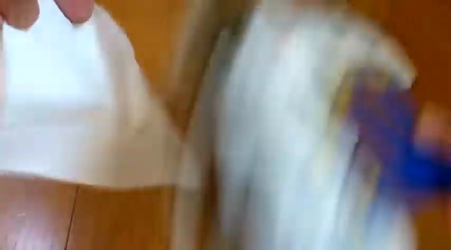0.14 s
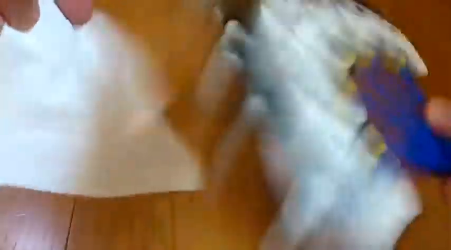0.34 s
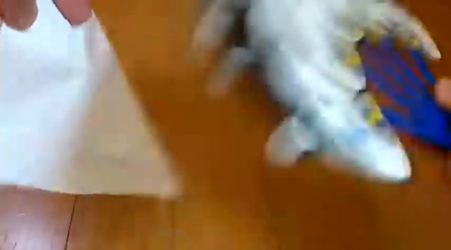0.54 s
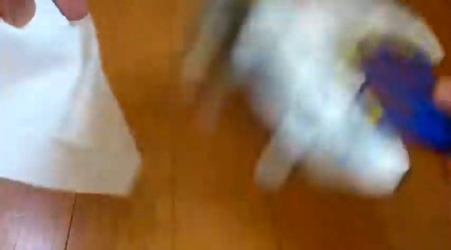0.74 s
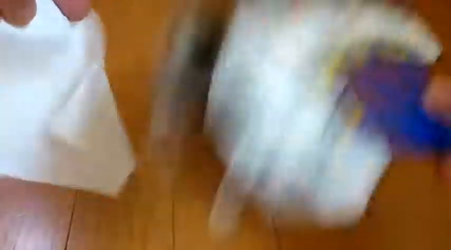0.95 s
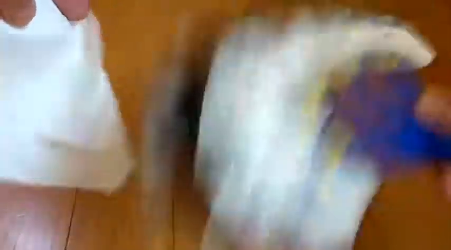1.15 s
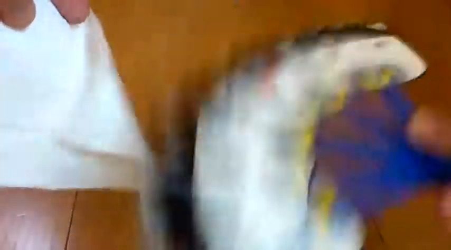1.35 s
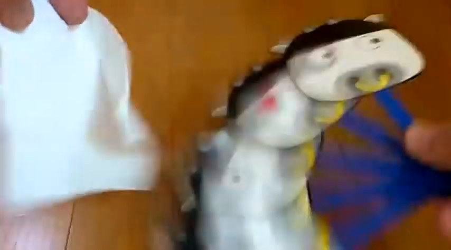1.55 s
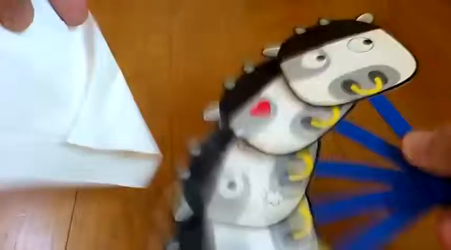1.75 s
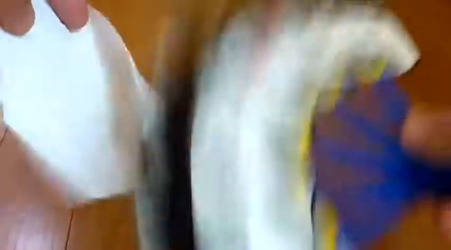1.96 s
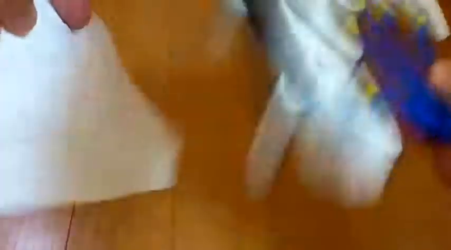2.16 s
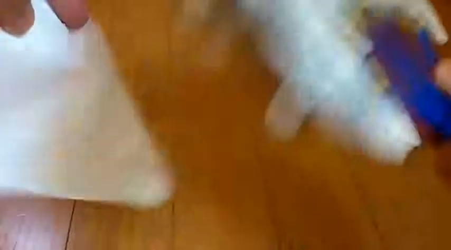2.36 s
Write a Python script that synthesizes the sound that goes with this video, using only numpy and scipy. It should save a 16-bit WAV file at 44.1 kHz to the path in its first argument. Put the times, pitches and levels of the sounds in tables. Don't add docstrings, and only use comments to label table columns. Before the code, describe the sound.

Folding fan snaps loudly once, then rustles and ticks as it is waved in a quiet room

```python
import sys
import numpy as np
from scipy import signal
from scipy.fft import rfft, irfft
from scipy.io import wavfile

SR = 44100
rng = np.random.default_rng(int(sys.argv[2]) if len(sys.argv) > 2 else 0)


def transcribe(signal):
    frames = np.atleast_2d(signal).T
    limited = np.clip(frames, -1, 1)
    pcm = np.round(limited * 32767).astype(np.int16)
    wavfile.write(sys.argv[1], SR, pcm)


def gain_from_db(level_db):
    decades = np.asarray(level_db, float) / 20
    return 10 ** decades


N = 105840


def rms_one(x):
    return x / np.sqrt(np.mean(x ** 2) + 1e-20)


def drift(rate_hz):
    r = np.exp(-2 * np.pi * rate_hz / SR)
    wander = signal.lfilter([1], [1, -2 * r, r * r], rng.standard_normal(N + SR))
    return rms_one(wander[SR:])


def ring(x, hz, t60_s):
    r = gain_from_db(-60 / (t60_s * SR))
    w = 2 * np.pi * hz / SR
    return signal.lfilter([0, np.sin(w)], [1, -2 * r * np.cos(w), r * r], x + 1e-18)


def peak(x, hz, width_hz):
    r = np.exp(-np.pi * width_hz / SR)
    poles = [1, -2 * r * np.cos(2 * np.pi * hz / SR), r * r]
    return signal.lfilter([(1 - r * r) / 2, 0, (r * r - 1) / 2], poles, x + 1e-18)


def at_hz(points, hz):
    table_hz, values = np.transpose(points)
    return np.interp(np.log(hz), np.log(table_hz), values)


# pitch_hz, density_db (per Hz)
ROOM_TONE = [(12, -34), (20, 5), (120, -8), (310, -16), (659, -13.5), (2190, -20.5), (3430, -20),
             (8390, -25.5), (16000, -38.5)]
# pitch_hz, alike_share
LIKENESS = [(60, 0.73), (180, 0.66), (550, 0.47), (1650, 0.1), (4970, -3.8), (15000, -4)]
ROOM_TONE_DB, RUMBLE_RISE_DB, PAN_DB = -56.5, 5.5, 0.9
HUM_HZ, HUM_WIDTH_HZ, HUM_WAVERING_DB, HUM_STEADY_DB = 119, 9.0, -65, -64.5
MOTOR_HZ, MOTOR_WIDTH_HZ, MOTOR_DB = 52.7, 5.1, -67.5


def room_tone():
    white = rng.standard_normal((2, 2, N + SR))
    edges = 20 * 2 ** np.arange(0, 10.1, .5)
    tone = 0
    for k, (low, high) in enumerate(zip(edges, edges[1:])):
        band = signal.butter(2, [low, high], "band", fs=SR, output="sos")
        mid, side = signal.sosfilt(band, white[k % 2])[:, SR:]
        centre_hz = np.sqrt(low * high)
        alike = np.clip(at_hz(LIKENESS, centre_hz), 0, 1)
        swell_db = (50 < low < 300) * RUMBLE_RISE_DB * np.arange(N) / N
        stereo = np.sqrt(1 + alike) * mid + np.sqrt(1 - alike) * side * [[1], [-1]]
        tone = tone + gain_from_db(at_hz(ROOM_TONE, centre_hz) + swell_db) * stereo
    motor = rms_one(peak(white[0, 1], MOTOR_HZ, MOTOR_WIDTH_HZ)[SR:])
    wavering = peak(rng.standard_normal(N + SR), HUM_HZ, HUM_WIDTH_HZ)
    wavering = rms_one(peak(wavering, HUM_HZ, 2 * HUM_WIDTH_HZ)[SR:])
    steady = np.sqrt(2) * np.sin(2 * np.pi * HUM_HZ * np.arange(N) / SR)
    hum = gain_from_db(HUM_WAVERING_DB) * wavering + gain_from_db(HUM_STEADY_DB) * steady
    background = gain_from_db(ROOM_TONE_DB) * rms_one(tone) + gain_from_db(MOTOR_DB) * motor + hum
    return background * gain_from_db(PAN_DB * np.array([[1], [-1]]))


# time_s, level_db
EFFORT = [
    (0.0, -66.5),
    (0.17, -73),
    (0.29, -70),
    (0.91, -68),
    (1.48, -67),
    (1.86, -64.5),
    (2.4, -61),
]
GRAINS_PER_S, GRAIN_SPREAD_DB, GRAIN_CYCLES = 3000, 3.0, 3.8
RUSTLE_DB, CLUMP_DB, CLUMP_HZ = -3.0, 2.5, 40.0
SETTLE_S, SETTLE_DB = 0.014, -28.5


def leaf_rustle(ticks):
    effort_db = np.interp(np.arange(N) / SR, *np.transpose(EFFORT))
    jolts = np.zeros(N)
    jolts[[int(row[0] * SR) for row in ticks]] = gain_from_db(np.array([row[1] + SETTLE_DB for row in ticks]))
    settling = signal.lfilter([1], [1, -np.exp(-1 / (SETTLE_S * SR))], jolts)
    sizes = gain_from_db(GRAIN_SPREAD_DB * np.minimum(rng.exponential(1, N), 3)) * rng.choice([-1, 1], N)
    clicks = sizes * (rng.random(N) < GRAINS_PER_S / SR)
    pitches_hz = np.geomspace(1500, 11000, num=14)
    dealt = rng.integers(0, 14, size=N)
    grains = 0
    for k, hz in enumerate(pitches_hz):
        grains = grains + ring(clicks * (dealt == k), hz, GRAIN_CYCLES / hz) * (hz / 3000) ** 0.39
    return (gain_from_db(effort_db + RUSTLE_DB) + settling) * gain_from_db(CLUMP_DB * drift(CLUMP_HZ)) * rms_one(grains)


# pitch_hz, level_db, t60_s
BODY = [(347, -8, 0.012), (470, -10, 0.032), (652.3, -7.5, 0.1), (729, -10, 0.07), (875, -16, 0.064),
        (1014, -9.5, 0.022), (1330, -7.5, 0.02), (1526, -15.5, 0.042), (1845, -16.5, 0.084),
        (2300, -13.5, 0.033), (3350, -15.5, 0.072)]
CONTACT_SWELL, CRACK = 0.79, 3.38
CONTACT_APART = .45
CONTACT_CUT_HZ, CONTACT_TOP_HZ, CONTACT_OVER_DB = 1960, 10870, -9.5
BRIGHT_Q, KNOCK_SPREAD_DB = 4.5, 4.6


def contacts(rows, gain_db, knock_gain_db, bright_db):
    t = np.arange(1024) / SR
    out = np.zeros((2, N + SR))
    knocks = np.zeros((len(BODY), N + SR))
    low_cut = signal.butter(3, CONTACT_CUT_HZ, "high", fs=SR, output="sos")
    top_cut = signal.butter(4, CONTACT_TOP_HZ, fs=SR, output="sos")
    for start_s, peak_db, brightest_hz, contact_ms, knock_db in rows:
        grit, other = rng.standard_normal((2, len(t))) * gain_from_db(4.1 * rng.standard_normal(len(t)))
        grit = grit + CONTACT_APART * other * np.array([[1], [-1]])
        phase = t * 2000 / max(contact_ms, .3)
        burst = grit * phase ** CONTACT_SWELL * np.exp(-phase)
        burst[:, 6] += CRACK * np.sign(grit[0, 0])
        bright = peak(burst, brightest_hz, brightest_hz / BRIGHT_Q)
        burst = signal.sosfilt(low_cut, burst + gain_from_db(bright_db) * bright)
        knock_db = knock_db + knock_gain_db
        burst = signal.sosfilt(top_cut, burst) + gain_from_db(CONTACT_OVER_DB - (knock_db + 26.5)) * burst
        i = int(start_s * SR)
        out[:, i:i + len(t)] += gain_from_db(peak_db + gain_db) * burst / np.abs(burst).max()
        uneven_db = KNOCK_SPREAD_DB * rng.standard_normal(len(BODY))
        knocks[:, i] += gain_from_db(peak_db + knock_db + uneven_db) * rng.choice([-1, 1], len(BODY))
    for knock, (hz, level_db, t60_s) in zip(knocks, BODY):
        out += gain_from_db(level_db - 3.5) * ring(knock, hz, t60_s)
    return out[:, :N]


# start_s, peak_db, brightest_hz, contact_ms, knock_db
TICKS_EARLY = [(0.1082, -33.5, 2500, 2.7, -20), (0.1144, -35, 3350, 3.1, -17),
               (0.1386, -31, 7100, 1.8, -20.5), (0.196, -34.5, 3500, 4.6, -18),
               (0.2074, -43, 7580, 2.2, -19), (0.3288, -29, 8450, 2.2, -47),
               (0.3386, -27.5, 2840, 1.9, -19.5), (0.3390, -31.5, 9000, 1.7, -45.5),
               (0.3504, -33.5, 5500, 6.6, -34), (0.3564, -36, 5800, 1.7, -18.5),
               (0.3624, -37, 7400, 1, -27), (0.4155, -40.5, 3600, 3.3, -17),
               (0.4245, -35.5, 3380, 0.9, -21), (0.4816, -36, 4800, 7.2, -13.5),
               (0.4864, -34, 5050, 5.5, -80), (0.5587, -43, 2800, 5.9, -7.5), (0.5714, -47, 7600, 9.6, -16),
               (0.5923, -36.5, 1800, 1.04, -17), (0.6489, -43, 1840, 6.8, -21),
               (0.6958, -45, 5300, 3.2, -13), (0.7264, -32, 7260, 1.4, -30),
               (0.7736, -41.5, 4770, 1.8, -11.5), (0.7911, -35, 2570, 3.6, -16),
               (0.8037, -30, 3600, 1.4, -26), (0.8191, -37.5, 3360, 7, -9.5)]
TICKS_MIDDLE = [(0.871, -33, 3300, 2.1, -18.5), (0.8726, -31, 8100, 1, -29.5),
                (1.0253, -33.5, 3920, 2.95, -18), (1.046, -36, 1770, 1.6, -28),
                (1.0596, -44.5, 2600, 2.7, -7), (1.0934, -47.5, 5100, 3.3, -10),
                (1.1428, -56, 8590, 2.7, -4), (1.1684, -39.5, 7200, 1.6, -26),
                (1.2124, -39.5, 2600, 3.2, -13), (1.2302, -30.5, 4100, 2.25, -17),
                (1.2452, -41, 7800, 1.7, -24), (1.2600, -33, 2300, 1.7, -14), (1.2622, -37, 5240, 1.5, -48),
                (1.274, -44, 8300, 3, -12), (1.468, -36, 6800, 2, -17), (1.3169, -39, 3600, 5.2, -14.5),
                (1.3643, -38, 8250, 2.2, -20), (1.453, -39.5, 4000, 3, -12), (1.4826, -36, 4670, 2.7, -12),
                (1.5362, -48.5, 5200, 4.2, -23), (1.559, -43, 3600, 3, -10), (1.59, -36.5, 5740, 0.99, -15),
                (1.6581, -39.5, 2620, 2.5, -9), (1.6749, -29, 4150, 2.3, -14),
                (1.6814, -45, 6160, 2.5, -25), (1.6894, -41, 5550, 4.5, -32),
                (1.7045, -37, 6500, 0.81, -20.5), (1.7048, -33, 2270, 1.9, -17.5),
                (1.7204, -47, 5330, 3.9, -21)]
TICKS_LATE = [(1.7545, -47, 6860, 3.2, -25), (1.7568, -32, 7800, 2.5, -35), (1.7572, -30.5, 3400, 1.6, -17),
              (1.7646, -65, 7900, 0.88, -19.5), (1.7998, -64, 2770, 1.3, -20),
              (1.8814, -45.5, 2480, 4.7, -0.5), (1.8916, -39, 3580, 12, -25),
              (1.8966, -30.5, 5600, 0.66, -17), (1.9155, -36, 5440, 3.4, -11),
              (1.9628, -28.5, 12400, 0.593, -45), (1.9626, -41, 5000, 4.2, -19), (1.992, -45, 7500, 1, -23),
              (2.0030, -47, 7500, 1, -18), (2.0018, -47, 3450, 3.6, -11), (2.0423, -32.5, 2620, 4.2, -13),
              (2.0454, -31.5, 5360, 3, -25), (2.0574, -33.5, 8600, 1.6, -17),
              (2.0416, -37, 12500, 4.7, -56), (2.1188, -28, 7200, 0.51, -67),
              (2.1192, -36.5, 4120, 2.6, -21), (2.1276, -37, 9000, 0.99, -37), (2.1494, -54, 6020, 2.9, -5),
              (2.1715, -42.5, 5800, 2.3, -11), (2.2578, -39, 3590, 2.8, -8.5),
              (2.3346, -36, 5850, 1.9, -17), (2.3845, -34, 5610, 3.8, -17)]


def rib_ticks(ticks):
    return contacts(ticks, gain_db=0, knock_gain_db=3, bright_db=10.0)


# start_s, peak_db, brightest_hz, contact_ms, knock_db
SNAP = [(.2350, -21, 7000, 3.7, -19), (.2371, -9.5, 7240, 0.56, -12), (.2378, -13.5, 2300, 2.5, -7.5),
        (.2383, -4.5, 7700, 1.6, -20.5), (.2395, -9, 3440, 2.3, -42), (.2443, -18.5, 7000, 0.82, -5.5),
        (.2517, 0.5, 7460, 1.26, -24), (.2526, -8, 3350, 2.3, -24), (.2590, -16.5, 6800, 1.2, -16.5),
        (.2650, -21, 7500, 2.7, -19.5), (.2720, -23, 8500, 2.5, -20), (.2870, -27, 8350, 0.68, -10.5)]


def leaf_snap():
    snap = contacts(SNAP, gain_db=-2, knock_gain_db=0, bright_db=12.0)
    return snap * gain_from_db([[0], [-1]])


THUD_HZ, THUD_DB, THUD_T60_S = 77, -17, 0.088


def air_thud():
    start_s, peak_db = SNAP[0][:2]
    click = np.zeros(N)
    click[int(start_s * SR)] = gain_from_db(peak_db + THUD_DB)
    return ring(click, THUD_HZ, THUD_T60_S) + gain_from_db(0.5) * ring(click, THUD_HZ, 1.8 * THUD_T60_S)


FLOOR_ECHO_S, FLOOR_ECHO_DB = .0072, -19.0
EARLY_T60_S, EARLY_DB, LATE_T60_S, LATE_DB = 0.16, -9, 0.51, -18
SCATTER_DB, WALL_CUT_HZ = 3, 8000


def room(x):
    t = np.arange(SR // 2) / SR
    noise = rng.standard_normal((2, 2, len(t))) * np.minimum(t / FLOOR_ECHO_S, 1) ** 2
    ragged_db = SCATTER_DB * np.repeat(rng.standard_normal(len(t) // 50), 50)
    noise = noise * rms_one(gain_from_db(ragged_db))
    tail = np.zeros((2, len(t)))
    for n, db, t60_s in zip(noise, (EARLY_DB, LATE_DB), (EARLY_T60_S, LATE_T60_S)):
        tail += gain_from_db(db) * n * gain_from_db(-60 * t / t60_s) / np.sqrt(t60_s * SR / 14)
    tail[:, int(FLOOR_ECHO_S * SR)] += gain_from_db(FLOOR_ECHO_DB)
    wet = signal.fftconvolve(x, tail, axes=1)[:, :N]
    return signal.lfilter(*signal.butter(1, WALL_CUT_HZ, fs=SR), wet)


# pitch_hz, width_hz, gain_db
PORT_LEFT = [(7500, 3500, 6.5), (3400, 2100, 3.5)]
PORT_RIGHT = [(4670, 700, 12.06), (15800, 6000, 9.3)]
RIGHT_DB, RIGHT_LAG_S = -3.5, .0001
RIGHT_DIP_HZ, RIGHT_DIP_WIDTH_HZ, RIGHT_DIP_SHARE = 9600, 6200, 0.86


def port(x, resonances):
    return x + sum((gain_from_db(gain_db) - 1) * peak(x, hz, width_hz) for hz, width_hz, gain_db in resonances)


def ports(x):
    left, right = port(x[0], PORT_LEFT), port(x[1], PORT_RIGHT)
    shaded = right - RIGHT_DIP_SHARE * peak(right, RIGHT_DIP_HZ, RIGHT_DIP_WIDTH_HZ)
    right = gain_from_db(RIGHT_DB) * shaded
    lag = np.exp(-2j * np.pi * np.arange(N // 2 + 1) / N * RIGHT_LAG_S * SR)
    return np.array([left, irfft(rfft(right) * lag, N)])


def scene():
    ticks = TICKS_EARLY + TICKS_MIDDLE + TICKS_LATE
    background = room_tone()
    fan = leaf_rustle(ticks) + rib_ticks(ticks) + leaf_snap() + air_thud()
    return ports(fan + room(fan)) + background


def low_pass(x):
    return signal.sosfilt(signal.butter(12, 16100, fs=SR, output="sos"), x)


HISS_DB, BASS_CUT_HZ, TOP_CUT_HZ, CEILING = -70, 30.0, 16400, 1.1


def record(dry):
    hissy = dry + gain_from_db(HISS_DB) * rng.standard_normal(dry.shape)
    mix = signal.lfilter(*signal.butter(2, BASS_CUT_HZ, "high", fs=SR), hissy)
    mix = np.clip(mix, -CEILING, CEILING)
    mix = signal.sosfilt(signal.cheby2(10, 30, TOP_CUT_HZ, fs=SR, output="sos"), mix)
    return low_pass(mix)


dry = scene()
out = record(dry)
transcribe(out)
```